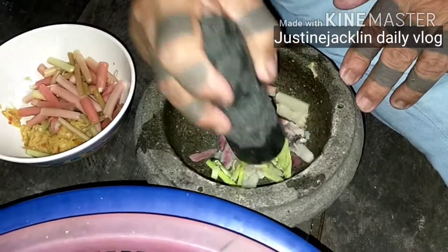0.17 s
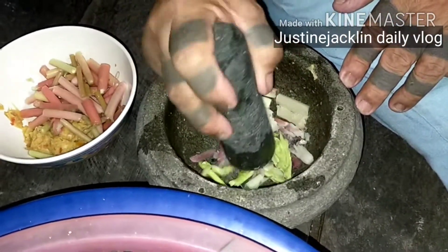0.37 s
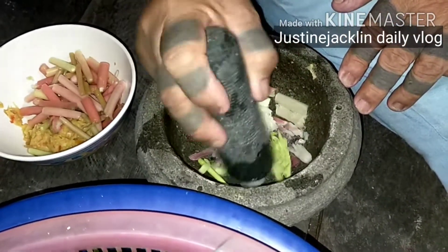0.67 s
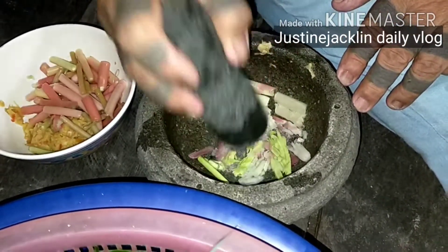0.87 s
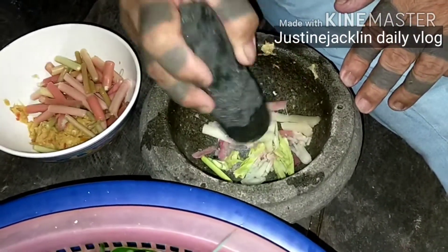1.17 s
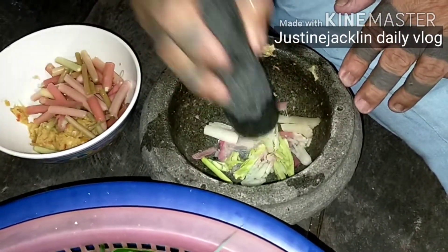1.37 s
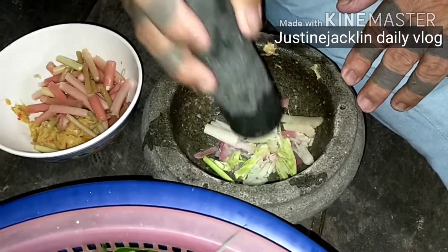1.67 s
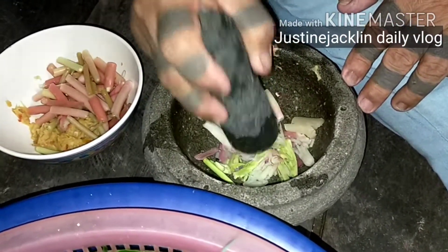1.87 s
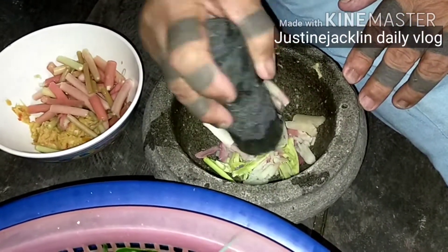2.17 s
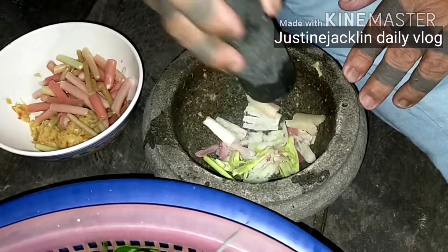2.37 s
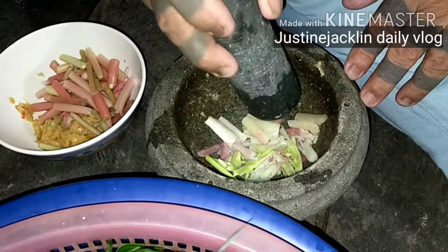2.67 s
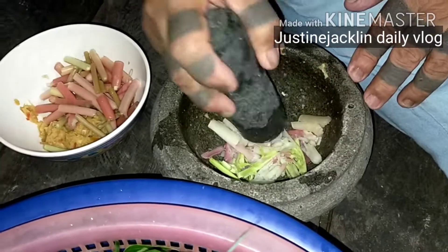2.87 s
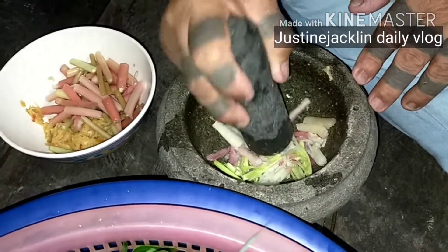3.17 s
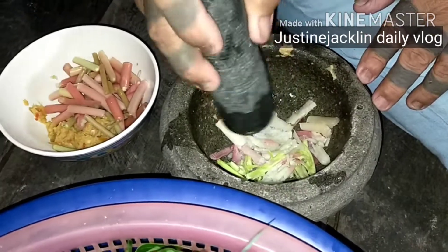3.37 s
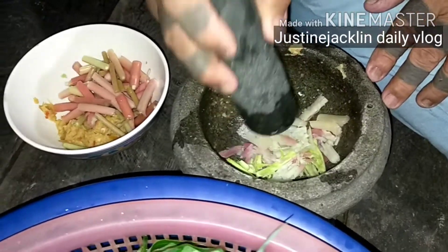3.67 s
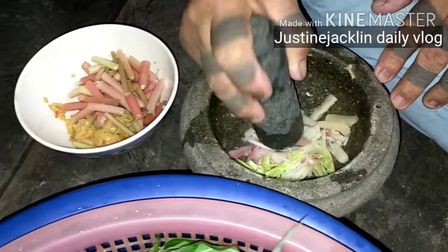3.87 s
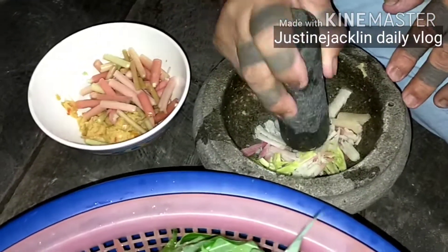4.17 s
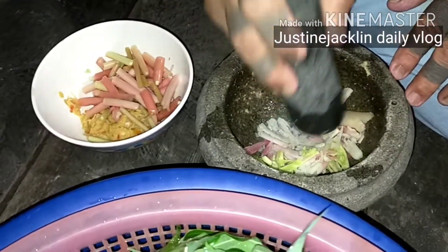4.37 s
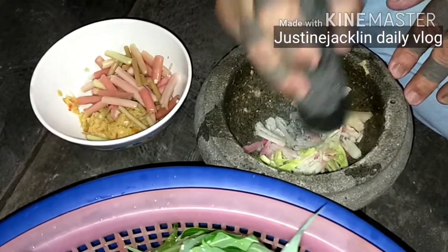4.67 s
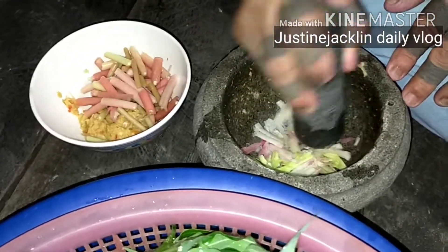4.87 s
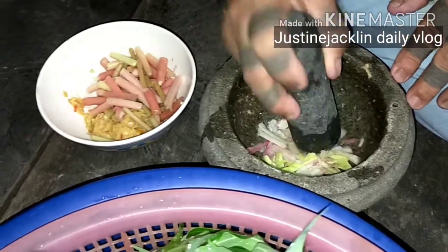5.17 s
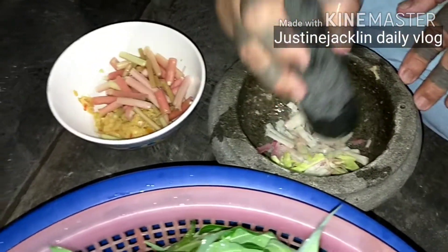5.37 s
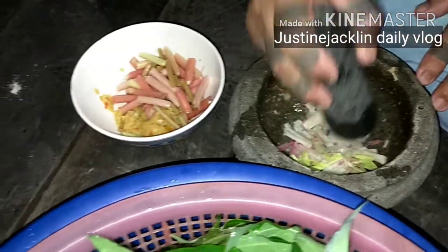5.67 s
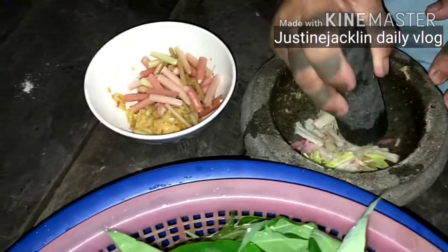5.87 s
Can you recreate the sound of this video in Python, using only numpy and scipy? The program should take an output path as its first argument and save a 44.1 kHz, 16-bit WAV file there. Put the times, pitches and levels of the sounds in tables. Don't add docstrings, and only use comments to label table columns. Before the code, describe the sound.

Steady close pounding in a heavy stone mortar, wet fibres crunching, occasional bare stone clacks, over a soft hiss of insects and faint cricket chirps.

```python
import sys
import numpy as np
from scipy import signal
from scipy.fft import rfft, irfft, next_fast_len
from scipy.io import wavfile
from scipy.ndimage import uniform_filter1d, map_coordinates

SR = 44100
rng = np.random.default_rng(int(sys.argv[2]) if len(sys.argv) > 2 else 0)


def makeup_ratio(level_db):
    decades = np.asarray(level_db, float) / 20
    return 10 ** decades


def store_wav(level_fs):
    pcm = np.round(np.clip(np.atleast_2d(level_fs), -1, 1) * 32767)
    wavfile.write(sys.argv[1], SR, pcm.T.astype(np.int16))


N = 265305

# (frequency [Hz], density [dB per Hz])
HISS_SPECTRUM = [(120, -37), (200, -5), (300, -11), (530, -3), (900, -1), (1800, -1.5), (2500, -2.5),
                 (3300, -9), (4600, -12), (5500, -12.5), (6300, -19), (9600, -22), (14900, -23),
                 (16000, -9.5)]
# (frequency [Hz], density [dB per Hz])
CHORUS_SPECTRUM = [(4500, -40), (4900, -2.5), (5400, 1.5), (5750, -15), (5950, -38), (7000, -37),
                   (7600, -8), (8150, 2), (8800, -6.5), (9400, -42)]
# (frequency [Hz], density [dB per Hz])
RUMBLE_SPECTRUM = [(20, -8), (40, 8.5), (70, -8), (100, 3), (160, -19.5), (260, -11.5), (400, -33.5)]
# (start [s], length [s], level [dB])
CRICKET_PHRASES = [
    (0.05, .4, -71),
    (1.206, 0.35, -56),
    (2.595, 0.17, -66),
    (3.896, .33, -61),
    (4.999, .78, -60),
]
# (time [s], level [dB])
PASTE_PEELS = [
    (1.2, -55.5),
    (1.35, -64),
    (1.55, -63),
    (2.15, -59),
    (2.85, -54.5),
    (5.75, -60),
]
# (time [s], level [dB])
METAL_RING = [
    (4.97, -52),
]
# (time [s], peak [dB], burst [ms], gain duck [dB], duck length [s])
BURSTS = [(0.052, -26.5, 1.03, 6.5, 0.1), (0.381, -25, 1.5, 4.5, 0.098), (0.703, -25, 0.82, 0.6, 0.15),
          (1.0576, -47, 0.43, 15, 0.086), (1.426, -23.5, 1.5, -1, 0.1), (1.769, -16.5, 0.92, 7.5, 0.1),
          (2.105, -22, 1.7, 12, 0.095), (2.437, -55, 0.83, 5.5, 0.11), (2.7985, -25, 1.55, 6, 0.095),
          (3.1356, -23, 1.3, 4.5, 0.11), (3.4758, -22.5, 1.05, 1.5, 0.061), (3.833, -24, 0.89, 11, 0.087),
          (4.1775, -17.5, 1, 6, 0.097), (4.5224, -14.5, 0.41, 13, 0.086), (4.84, -48, 1.1, -2, 0.097),
          (5.198, -22, 1.13, 4.5, 0.098), (5.534, -21.5, 1.26, 1.5, 0.091), (5.8667, -20, 0.98, 8.5, 0.089)]
# (time [s], peak [dB], burst [ms])
LATE_BURSTS = [
    (1.069, -48, 1.7),
    (1.343, -58, 8.0),
    (1.7645, -25, 0.8),
    (2.458, -39, 5.1),
    (2.853, -50, 4.7),
    (2.896, -58, 5.0),
    (4.85, -32, 6.7),
    (5.291, -61, 4.5),
    (5.594, -54, 1.15),
    (5.765, -54, 8.9),
]
# (frequency [Hz], density [dB per Hz])
FIBRE_SPECTRUM = [(700, -40), (1300, -6), (2000, -2), (4300, -4), (6800, -3), (8200, 4), (10500, -3),
                  (13000, -1.5), (15000, 4.5), (16500, -12)]
# (time [s], shove [dB], floor boom [dB], bowl rumble [dB], rock-back [dB])
STOPS = [(0.0553, -21, -28, -38.5, -19), (0.3846, -15, -22.5, -32, -19), (0.7043, -17, -25.5, -60, -15),
         (1.06, -37, -37.5, -42, -51), (1.4306, -25, -23, -42.5, -20), (1.7727, -31, -35, -47, -26),
         (2.108, -32, -32, -43, -25.5), (2.4438, -39, -29.5, -32, -52), (2.804, -25.5, -28.5, -40.5, -27),
         (3.1398, -25.5, -24, -36, -21), (3.4807, -15, -27, -32, -26), (3.8371, -24.3, -30.5, -36, -34),
         (4.1818, -21, -27, -36.5, -17), (4.524, -30, -31.5, -34, -51), (4.8421, -29, -29.5, -36, -31),
         (5.203, -23, -28.5, -38.5, -17), (5.5377, -13.5, -21.5, -30, -26.5),
         (5.868, -22.5, -30.5, -33, -45)]
# (frequency [Hz], width [Hz], level [dB])
FLOOR_MODES = [(43.3, 41.4, -2), (72.4, 28, -1.5), (116.3, 40.2, -2), (210, 52.6, -8)]
# (frequency [Hz], width [Hz], level [dB])
BOWL_MODES = [(300.4, 51, -5.5), (430, 146, -8.5), (577, 107, -6), (837, 75, -7), (1020, 135, -10.5),
              (1570, 680, -22), (2110, 590, -22)]
# (time [s], peak [dB], contact [Hz], pestle ring [dB], echo [dB])
KNOCKS = [(0.3848, -20, 690, -32, -22), (1.058, -7.5, 1770, -7.5, -16.5), (2.4421, -8, 1700, -3.5, -9.5),
          (2.4528, -16.5, 1140, -15, -25), (2.4602, -27, 760, -25, -13), (3.48, -10, 927, -25.5, -17),
          (3.8368, -7.5, 1140, -45, -13), (4.5226, -11, 1194, -35, -6), (4.8422, -17, 900, -8, -10.5),
          (5.537, -20.5, 683, -39, -6.5), (5.8672, -8, 1216, -36, -12), (5.8892, -25, 870, -18, -3.5)]
# (frequency [Hz], level [dB], t60 [s])
PESTLE_MODES = [(3608, -5, 0.07), (3669, -15, 0.15), (3625, -21, 0.15), (9100, -22.5, 0.012)]
# (frequency [Hz], level [dB], t60 [s])
RIM_MODES = [(2260, 6, 0.061), (2250, -8.5, 0.042), (1840, -22, 0.091), (1800, -30, 0.048)]
# (frequency [Hz], t60 [s])
ROOM_DECAY = [(100, 0.97), (400, 0.37), (1000, 0.18), (2500, 0.21), (8000, 0.3)]
# (time [s], peak [dB], contact [Hz])
PESTLE_TAPS = [
    (1.169, -31, 990),
    (2.614, -36, 972),
    (3.079, -33, 565),
    (3.386, -33, 560),
    (3.721, -33, 855),
    (5.593, -25.5, 627),
    (5.734, -29, 565),
]

HISS_DB, RUMBLE_DB, CHORUS_DB = -49.0, -54.9, -12
WING_REST_DB, WING_HZ, WING_RISE_HZ, WING_STOP_S = -68, 5490, 200, 0.07
WING_SWELL_SHARE = 0.39
PASTE_FLOOR_DB, PEEL_DB_PER_S, LET_GO_DB_PER_S = -66.5, 70, 130
RING_RISE_DB_PER_S, RING_FALL_DB_PER_S = 400, 71
JUICE_DB, JUICE_UNDER_DB = -42.5, -11.5
ROCK_MS, ROCK_MS_PER_DB, LIGHT_SHOVE_DB = 13.3, 0.24, -28
RIM_DB, RIM_UNDER_DB = -36, -19
MIC_TOP_HZ = 15700
LEAD_BURST_S, LEAD_STOP_S = 0.015, 0.01
SOUND_T_S = np.arange(SR // 3) / SR
SCENE_T_S = np.arange(N) / SR


def unit(x):
    return x / np.sqrt(np.mean(x ** 2) + 1e-20)


def along(points, hz):
    f, v = np.transpose(points)
    return np.interp(np.log(hz + 1), np.log(f + 1), v)


def wobble(knots_per_s):
    knots = rng.standard_normal(int(N * knots_per_s / SR) + 4)
    return map_coordinates(knots, [np.arange(N) * knots_per_s / SR])


def filtered(x, response):
    m = next_fast_len(len(x) + 8192)
    return irfft(rfft(x, m) * response(np.fft.rfftfreq(m, 1 / SR)), m)[:len(x)]


def coloured(spectrum, size):
    return unit(filtered(rng.standard_normal(size), lambda hz: makeup_ratio(along(spectrum, hz))))


def resonant(modes):
    def response(f):
        total = 0
        for k, (hz, width_hz, db) in enumerate(modes):
            damping = 1j * f * width_hz
            total = total + (-1) ** k * makeup_ratio(db) * damping / (hz * hz - f * f + damping)
        return total
    return response


def duck():
    gain_db = np.zeros(N)
    for s, _, _, dip_db, hold_s in BURSTS:
        since = SCENE_T_S - s
        held = np.interp(since, [-0.008, -0.002, hold_s - 0.003, hold_s + 0.003], [0, 1, 1, 0])
        over = (since > hold_s) * 0.068 * np.exp(-np.abs(since - hold_s) / 0.069)
        gain_db += max(dip_db, 0) * (over - held)
    return makeup_ratio(gain_db)


DUCK = duck()


def add(track, s, sound):
    part = track[max(round(s * SR), 0):][:len(sound)]
    part += sound[:len(part)] / DUCK[min(round((s + 0.01) * SR), N - 1)]


def peaks(rows, rise_db_per_s, fall_db_per_s):
    slopes = []
    for s, db in rows:
        slope = np.where(SCENE_T_S < s, rise_db_per_s, fall_db_per_s)
        slopes.append(db - slope * np.abs(SCENE_T_S - s))
    return np.max(slopes, axis=0)


def far_insects():
    z = signal.stft(coloured(HISS_SPECTRUM, N), nperseg=512)[2]
    patches = uniform_filter1d(rng.standard_normal(z.shape), size=6, axis=0)
    patches = uniform_filter1d(patches, size=10, axis=1)
    hiss = unit(signal.istft(z * makeup_ratio(1.27 * unit(patches)), nperseg=512)[1][:N])
    flutter_db = 2.3 * wobble(30) + 2.4 * wobble(2.963)
    chorus = makeup_ratio(CHORUS_DB) * coloured(CHORUS_SPECTRUM, N) * makeup_ratio(flutter_db)
    return makeup_ratio(HISS_DB) * filtered(hiss + chorus, lambda hz: 1 / (1 + (hz / 15600) ** 150))


def rumble():
    return makeup_ratio(RUMBLE_DB) * coloured(RUMBLE_SPECTRUM, N) * makeup_ratio(2.9 * wobble(13))


def phrases():
    hz, db = np.full(N, float(WING_HZ)), np.full(N, float(WING_REST_DB))
    for s, length_s, top_db in CRICKET_PHRASES:
        end = s + length_s
        stop, swelled = end + WING_STOP_S, s + WING_SWELL_SHARE * length_s
        hz += WING_RISE_HZ * np.interp(SCENE_T_S, [s, end, stop, end + 4 * WING_STOP_S], [0, 1, 1, 0])
        db += (top_db - WING_REST_DB) * np.interp(SCENE_T_S, [s, swelled, end, stop], [0, 1, 1, 0])
    return hz, db


def cricket():
    wing_hz, wing_db = phrases()
    strokes = np.sin(np.pi * np.cumsum(59 + 2.9 * wobble(3.8)) / SR) ** 2
    tone = np.sin(2 * np.pi * np.cumsum(wing_hz + 60 * wobble(150)) / SR)
    level_db = wing_db + 1.9 * wobble(4.5) + 2.9 * wobble(45)
    return makeup_ratio(level_db) * (0.49 + strokes) * tone


def paste():
    peel_db = peaks(PASTE_PEELS, PEEL_DB_PER_S, LET_GO_DB_PER_S)
    level_db = np.maximum(peel_db, PASTE_FLOOR_DB) + 2.1 * wobble(130)
    noise = coloured(FIBRE_SPECTRUM, N) * makeup_ratio(level_db)
    return filtered(noise, lambda hz: 1 / (1 + (hz / 15650) ** 150))


def crush():
    out, t = np.zeros(N), SOUND_T_S[:SR // 5] - LEAD_BURST_S
    for s, db, ms, *_ in sorted(BURSTS + LATE_BURSTS):
        spray_db = min(JUICE_DB - db, JUICE_UNDER_DB)
        w = max(ms, 0.2) / 1000
        burst = np.exp(-(np.abs(t) / np.where(t < 0, 1.3 * w, 1.8 * w)) ** 1.7)
        spray_decay = makeup_ratio(-60 * t / 0.091) + 0.37 * makeup_ratio(-60 * t / 0.28)
        spray = np.clip(t / w, 0, 1) * makeup_ratio(spray_db + 5.0) * spray_decay
        patches = list(zip(np.geomspace(1500, 15500, num=16), rng.normal(0, 1.65, size=16)))
        stalk = coloured(FIBRE_SPECTRUM, len(t))
        stalk = unit(filtered(stalk, lambda hz: makeup_ratio(along(patches, hz))))
        snaps = makeup_ratio(10.0 * uniform_filter1d(rng.standard_normal(len(t)), size=9))
        add(out, s - LEAD_BURST_S, makeup_ratio(db - 4) * (burst * snaps + spray) * stalk)
    return out


def thud():
    out, t = np.zeros(N), SOUND_T_S - LEAD_STOP_S
    squeeze = -np.exp(-((t + 0.001) / 0.003) ** 2) * (t < 0)
    shove = squeeze + (t >= 0) * 1.9 * np.exp(-np.abs(t) / 0.0006)
    heave = (t >= 0) * np.sin(2 * np.pi * 65 * t) * makeup_ratio(-60 * np.abs(t) / 0.1)
    swell = np.clip(t / 0.01, 0, 1)
    boom_shape = swell * (makeup_ratio(-60 * t / 0.13) + 0.22 * makeup_ratio(-60 * t / 0.55))
    bowl_shape = swell * makeup_ratio(-60 * t / 0.16)
    for s, db, boom_db, bowl_db, rock_db in STOPS:
        start = s - LEAD_STOP_S
        rock_ms = ROCK_MS + ROCK_MS_PER_DB * max(db - LIGHT_SHOVE_DB, 0)
        edge_hz = 800 * makeup_ratio(0.5 * (bowl_db - boom_db + 8))
        stop = filtered(shove, lambda hz: 1 / (1 + 1j * hz / edge_hz) ** 2)
        rock = stop + 0.35 * filtered(stop, resonant(FLOOR_MODES[2:]))
        add(out, start, makeup_ratio(db - 3.5) * stop + makeup_ratio(boom_db - 6.5) * heave)
        add(out, start + rock_ms / 1000, makeup_ratio(rock_db - 5.0) * rock)
        boom = unit(filtered(rng.standard_normal(len(t)) * boom_shape, resonant(FLOOR_MODES)))
        bowl = unit(filtered(rng.standard_normal(len(t)) * bowl_shape, resonant(BOWL_MODES)))
        add(out, start, makeup_ratio(boom_db - 17) * boom + makeup_ratio(bowl_db - 11) * bowl)
    return out


def contact(hz, turns):
    u = SOUND_T_S * hz
    rise = 0.16 * min(1150 / hz, 1)
    cycles = 0.85 * u + 0.36 * (1 - np.exp(-u / 0.34))
    return -np.sin(2 * np.pi * cycles) * np.exp(-u / turns) * (1 - np.exp(-(u / rise) ** 2))


def ringing(modes, free):
    t = SOUND_T_S
    ring = sum(makeup_ratio(db - 60 * t / (t60_s * free)) * np.sin(2 * np.pi * hz * t) for hz, db, t60_s in modes)
    return -ring * (1 - np.exp(-(t / 0.0006) ** 2))


def room_tail(tilt, length_s=0.4):
    hz, t, z = signal.stft(rng.standard_normal(int(length_s * SR)), SR, nperseg=256)
    decay = makeup_ratio(-60 * t / along(ROOM_DECAY, hz)[:, None])
    x = filtered(signal.istft(z * decay, SR, nperseg=256)[1], tilt)
    return x / np.linalg.norm(x)


def bowl_tilt(hz):
    return np.abs(0.98 + resonant(BOWL_MODES[3:])(hz)) / (1 + (hz / 4000) ** 2)


def knock():
    out = np.zeros(N)
    for s, db, hz, ring_db, echo_db in KNOCKS:
        rim_db = min(RIM_DB - db, RIM_UNDER_DB)
        turns = 0.9 * (1250 / hz) ** 0.56
        hit = filtered(makeup_ratio(6) * contact(hz, turns), lambda f: 1 / (1 + 1j * f / 5200) ** 3)
        free = min(hz / 1800, 1)
        ring = makeup_ratio(ring_db + 2.0) * ringing(PESTLE_MODES, free) + makeup_ratio(rim_db) * ringing(RIM_MODES, free)
        answer = np.pad(room_tail(bowl_tilt), (130, 0))
        sent = makeup_ratio(echo_db - 4.5) * hit + makeup_ratio(-15.5) * free ** 2 * ring
        echo = signal.fftconvolve(sent, answer)[:len(SOUND_T_S)]
        add(out, s, makeup_ratio(db) * (hit + ring + echo))
    return out


def taps():
    out = np.zeros(N)
    for s, db, hz in PESTLE_TAPS:
        add(out, s, makeup_ratio(db - 2.0) * contact(hz, turns=1.35))
    return out


def metal_ring():
    tone = np.sin(2 * np.pi * np.cumsum(1000 + 8 * wobble(25)) / SR)
    return makeup_ratio(peaks(METAL_RING, RING_RISE_DB_PER_S, RING_FALL_DB_PER_S)) * tone


def scene():
    night = far_insects() + rumble() + cricket() + paste() + metal_ring()
    pounding = crush() + thud() + knock() + taps()
    return (night + pounding)[None]


def top_cut(x):
    return signal.sosfilt(signal.butter(12, 16790, fs=SR, output="sos"), x)


def record(dry):
    def response(hz):
        port = (1j * hz / 30 / (1 + 1j * hz / 30)) ** 2
        top_db = along([(MIC_TOP_HZ, 0), (16100, -30), (16900, -50), (17500, -120)], hz)
        return port * makeup_ratio(top_db)
    mix = filtered(dry[0] * DUCK, response)[None]
    return top_cut(mix)


dry = scene()
out = record(dry)
store_wav(out)
```